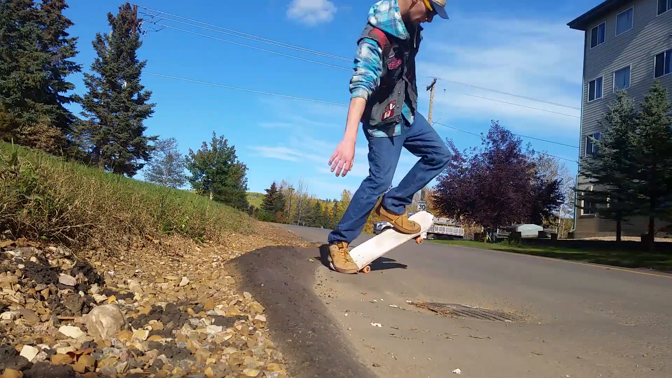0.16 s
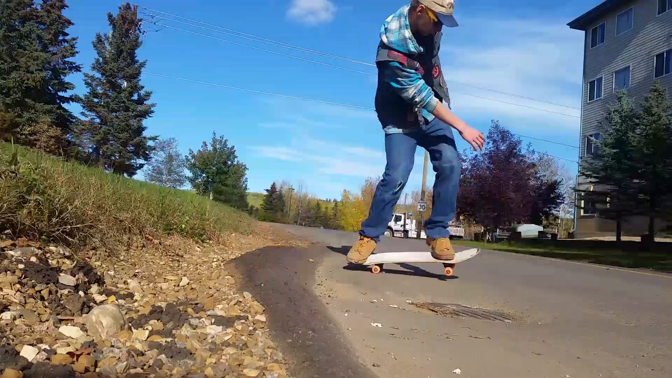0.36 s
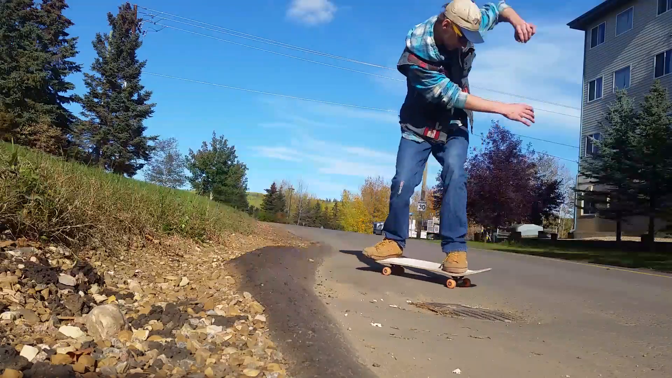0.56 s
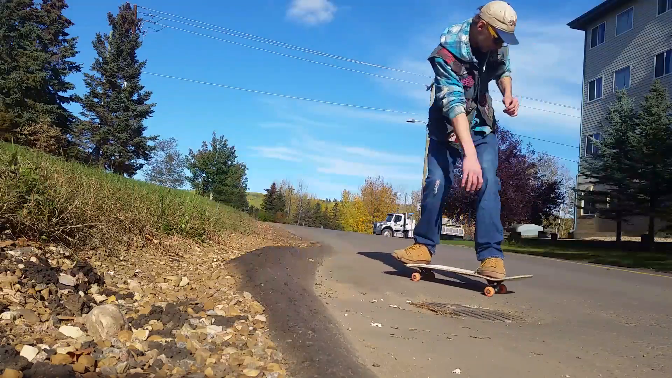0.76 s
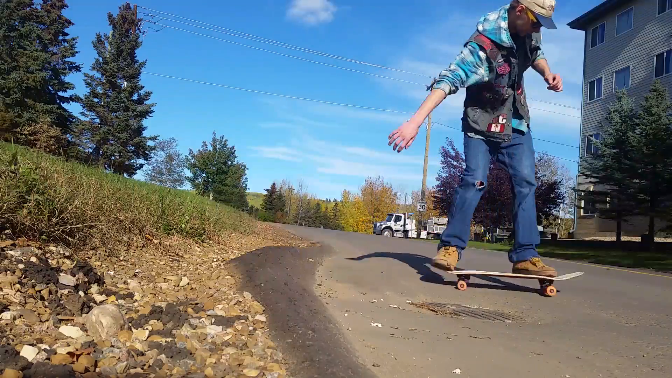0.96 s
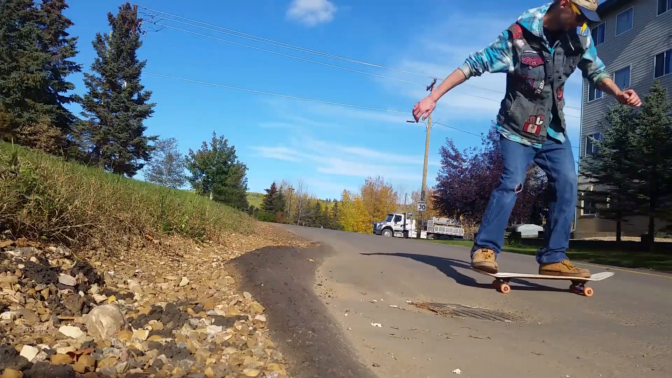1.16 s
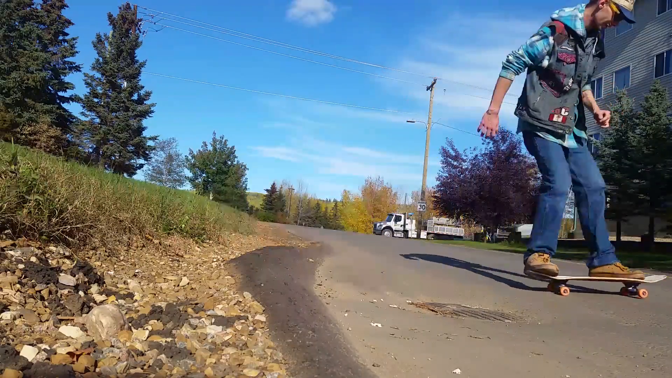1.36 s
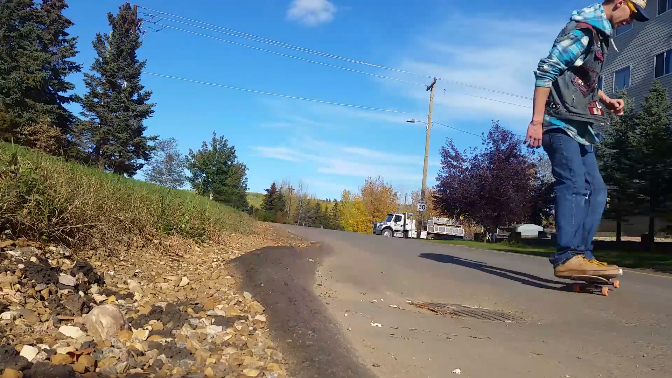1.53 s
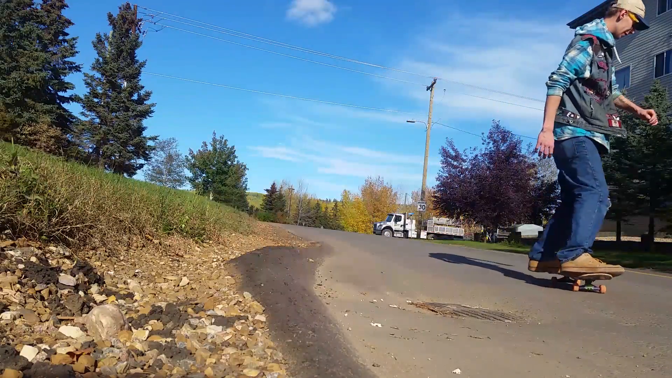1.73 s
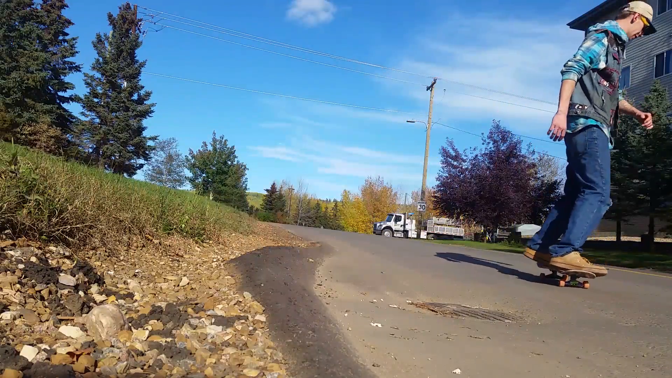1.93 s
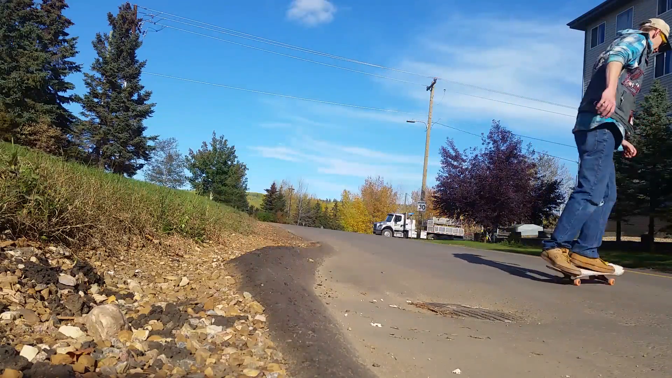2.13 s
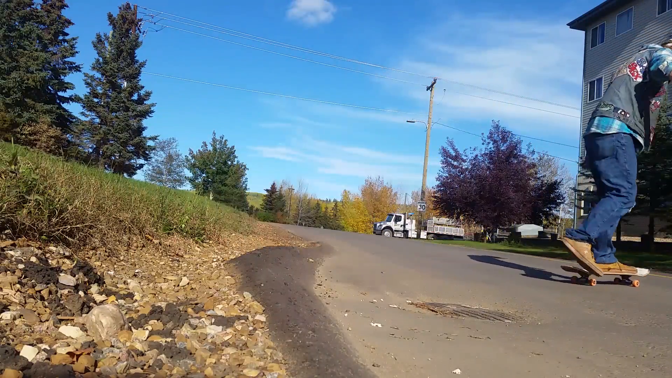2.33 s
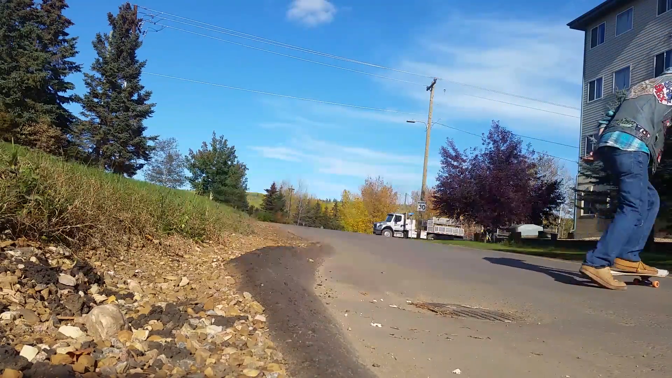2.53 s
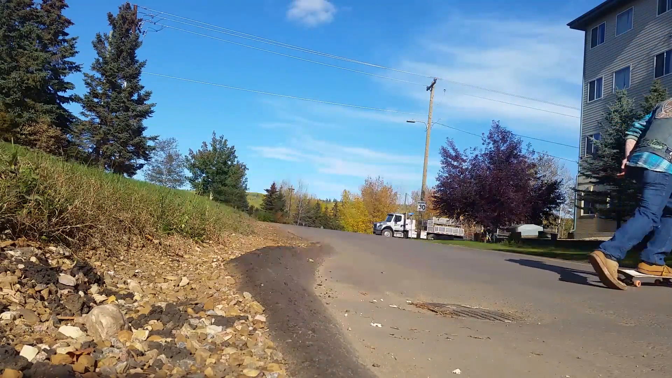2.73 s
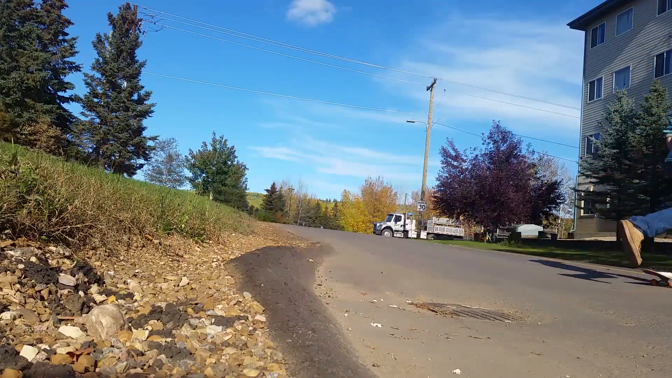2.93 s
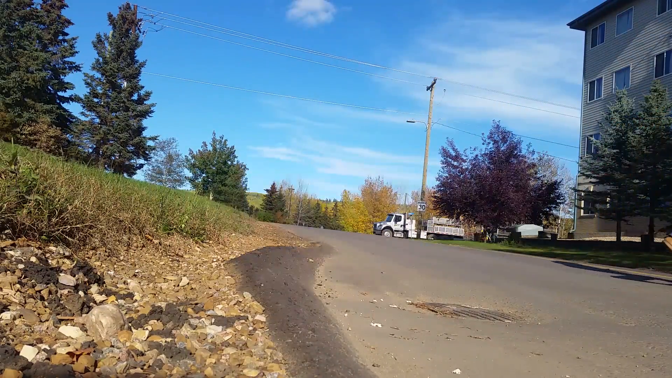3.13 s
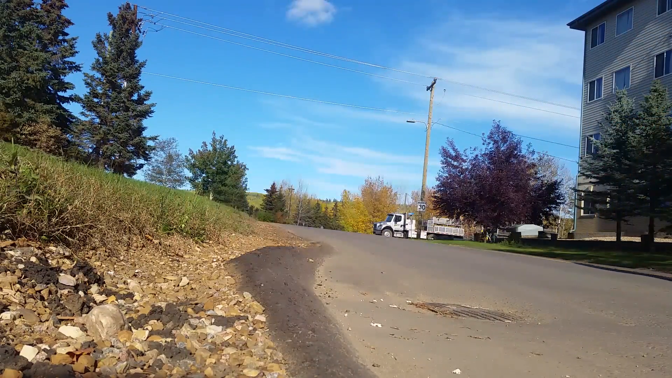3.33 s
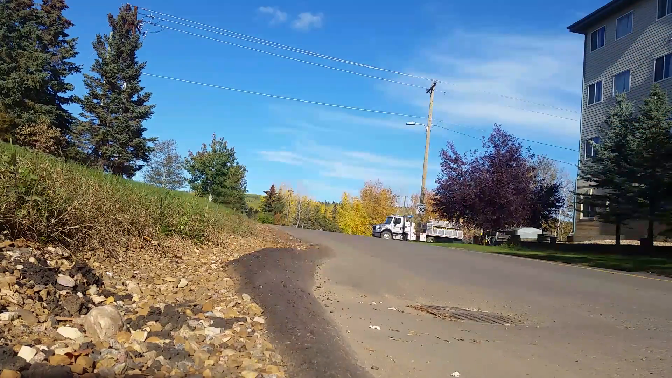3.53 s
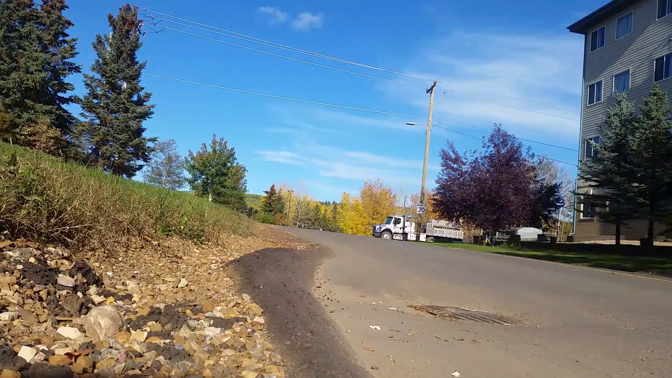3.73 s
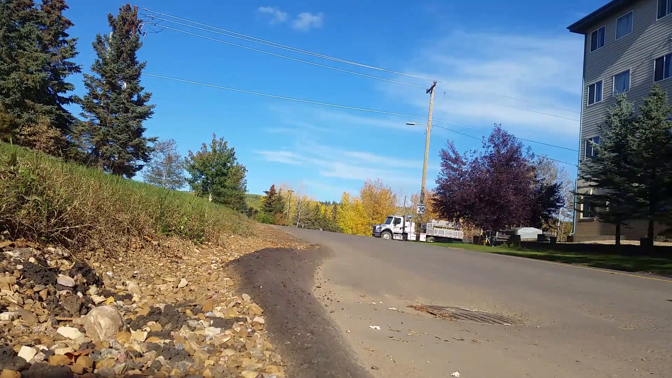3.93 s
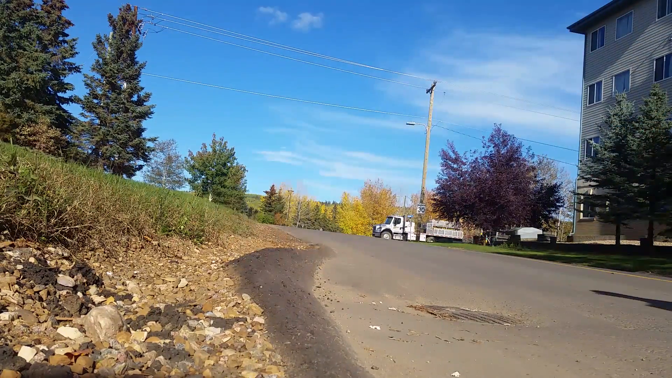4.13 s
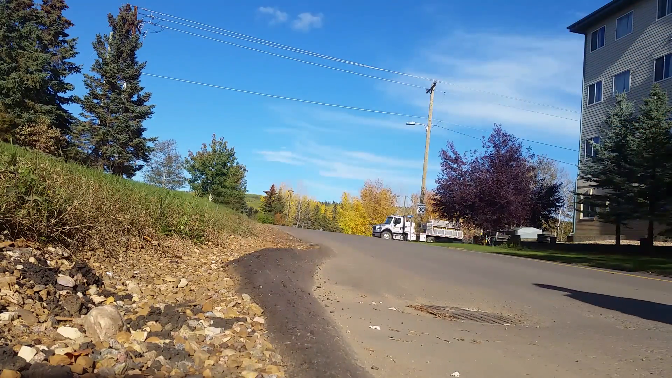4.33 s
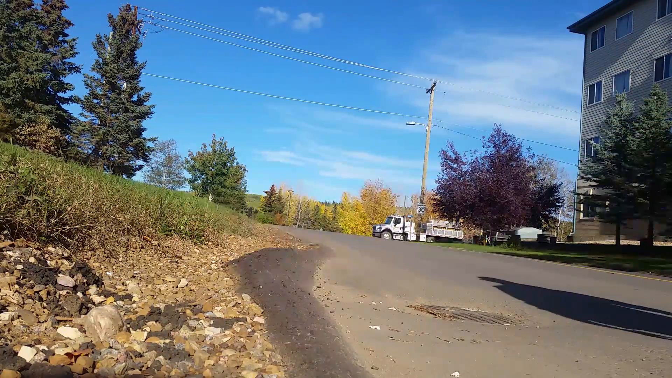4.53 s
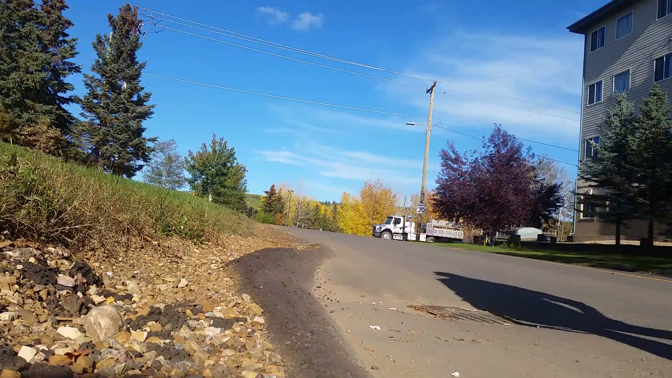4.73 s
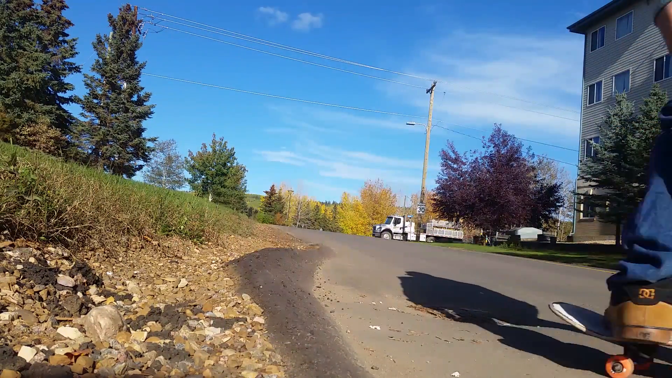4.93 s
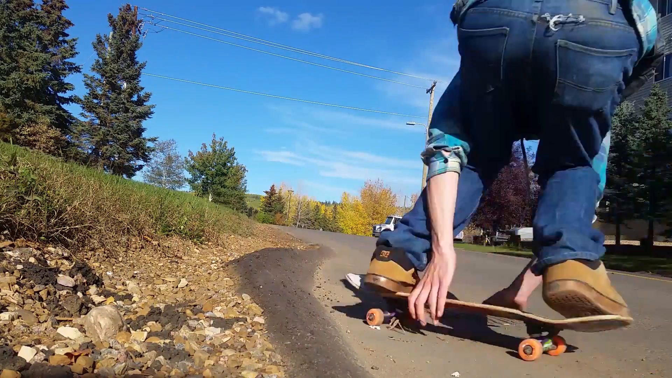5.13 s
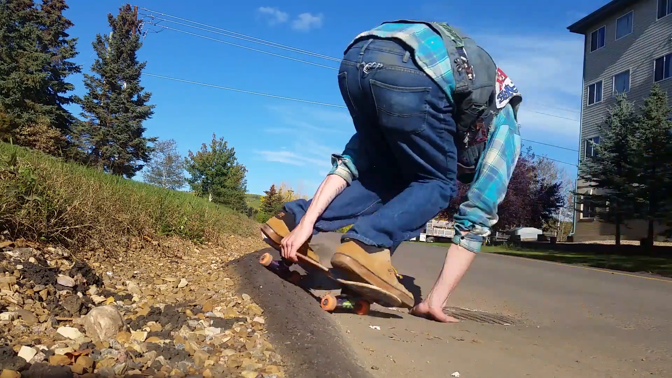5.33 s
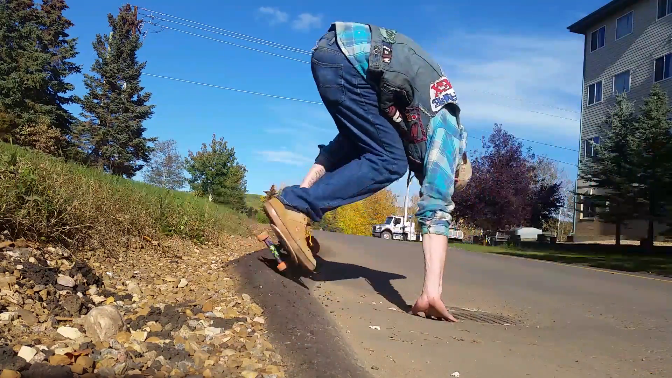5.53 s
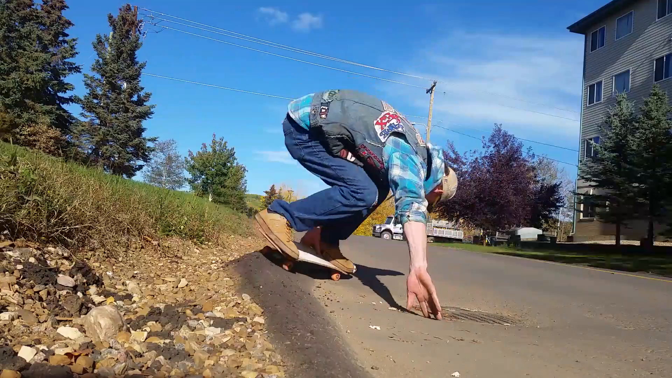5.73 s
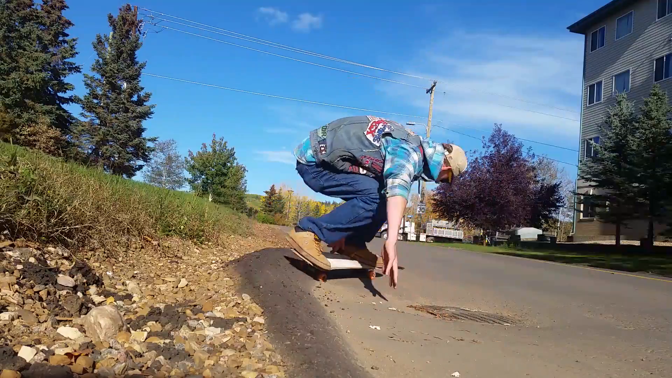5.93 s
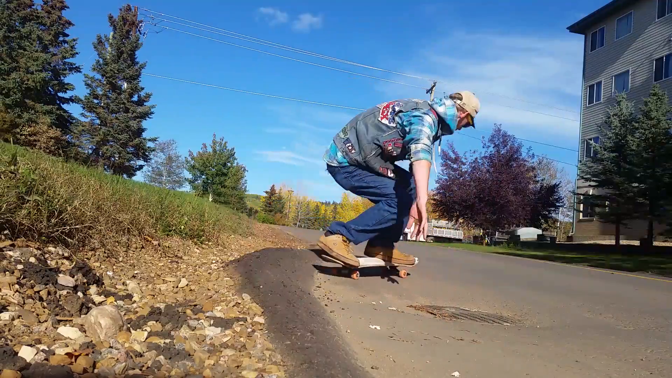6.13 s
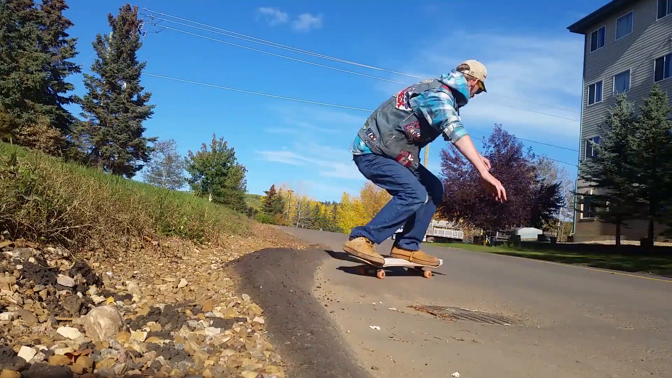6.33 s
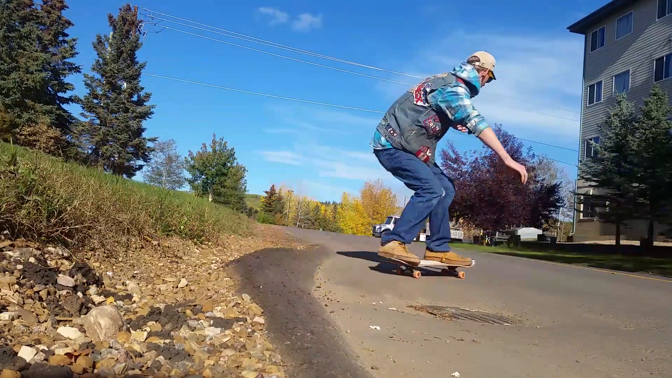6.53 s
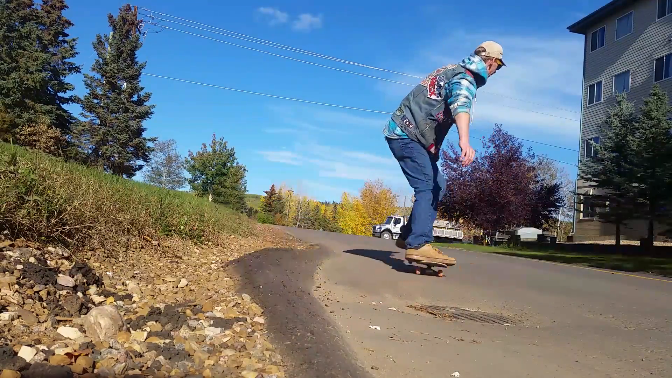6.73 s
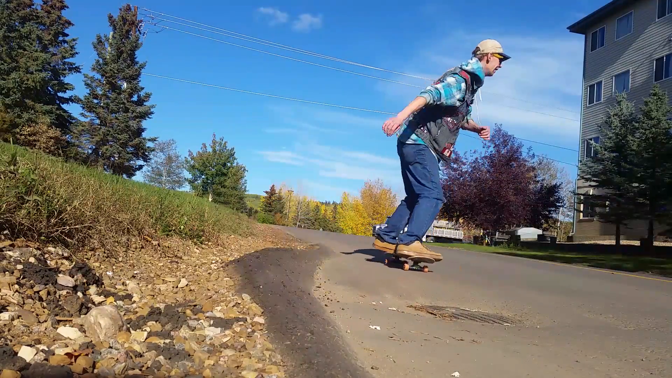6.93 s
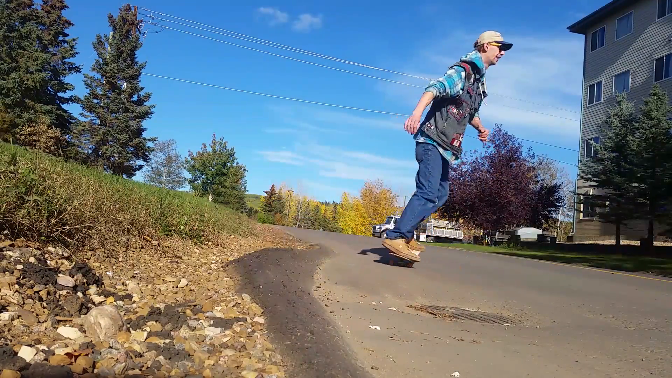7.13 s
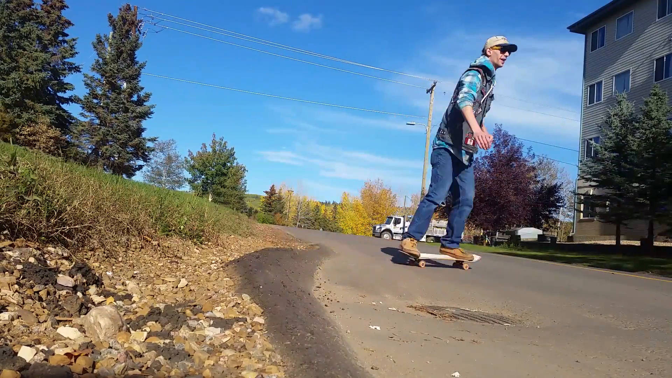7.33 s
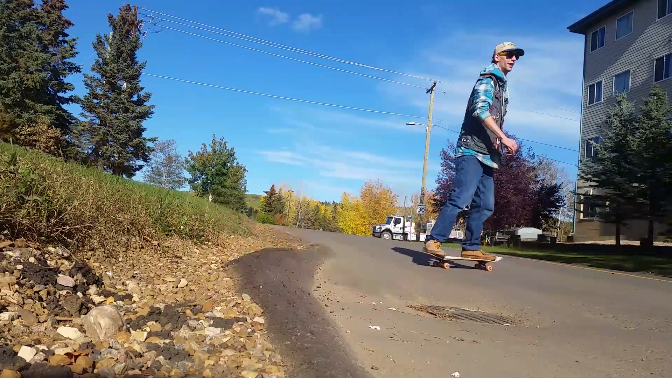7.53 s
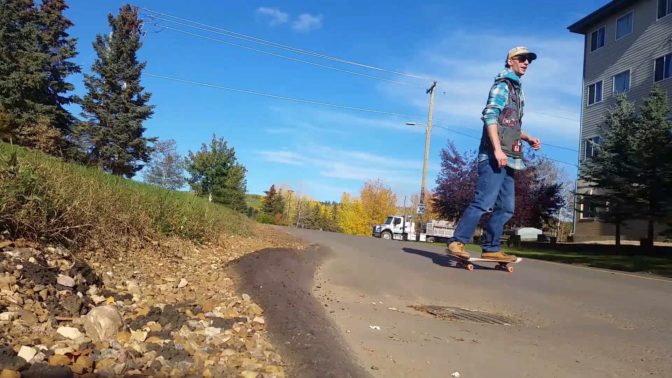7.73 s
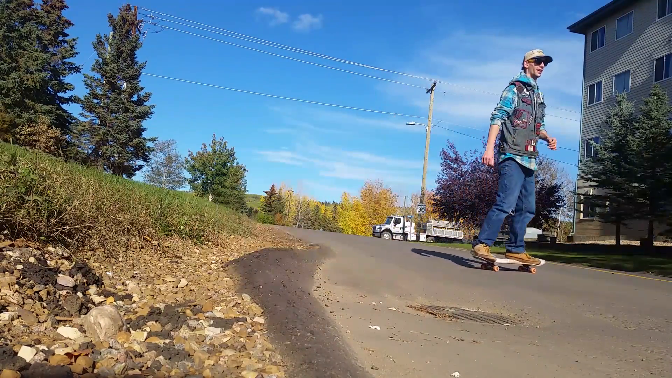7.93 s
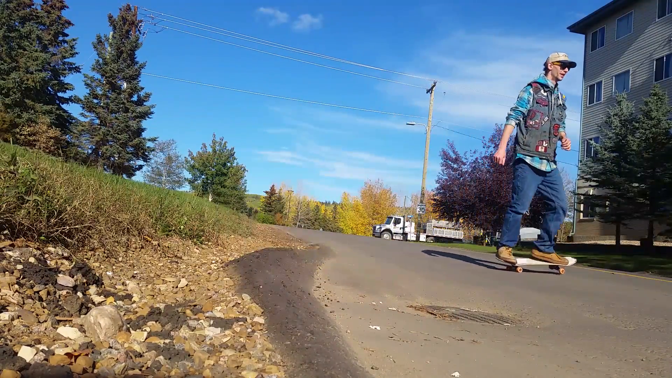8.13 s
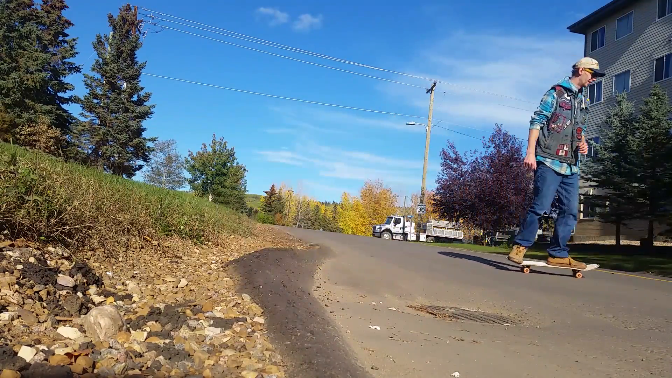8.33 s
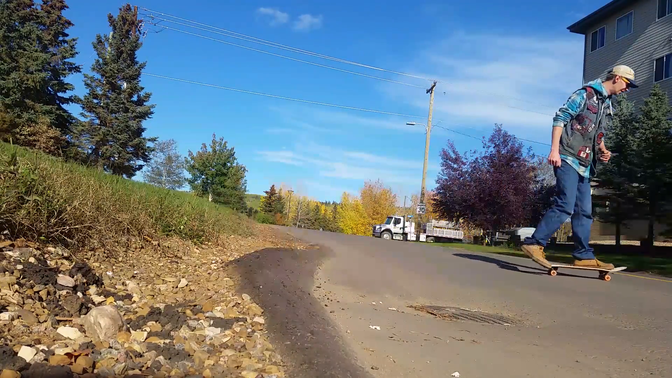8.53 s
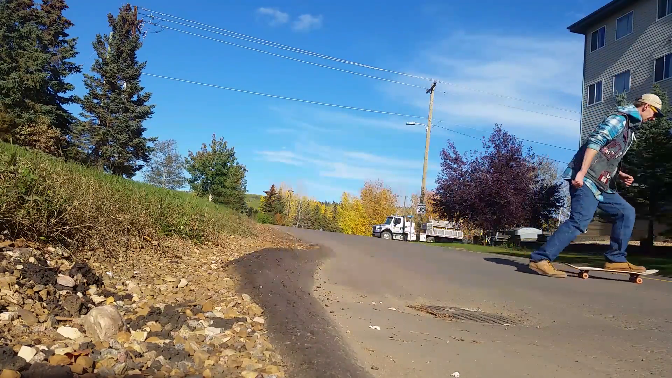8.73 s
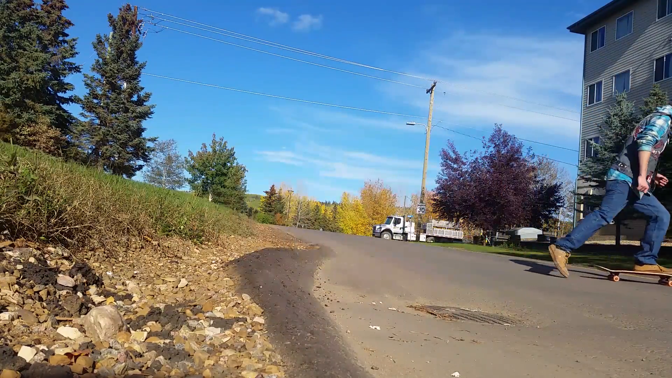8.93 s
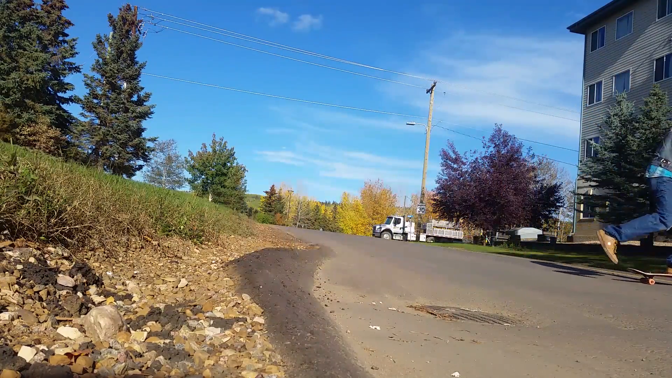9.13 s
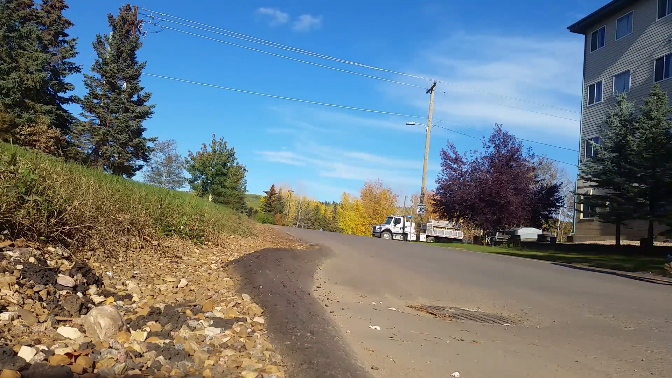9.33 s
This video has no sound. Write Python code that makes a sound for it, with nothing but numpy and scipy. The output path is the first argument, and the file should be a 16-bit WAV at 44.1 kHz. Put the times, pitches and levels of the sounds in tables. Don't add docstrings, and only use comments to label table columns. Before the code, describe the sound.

Gritty wheel rumble with small stone ticks comes first, broken by loose double clacks and one hard slap near two seconds. The sound thins toward the right and cuts out for an instant. Then a close pass swells into a droning roar, peaks with sharp curb knocks, and calms into lighter rolling with isolated cracks of wood and wheels. Outdoor street, low nearby microphones, lumpy low wind and slight wall echo.

```python
import sys
import numpy as np
from scipy import signal
from scipy.io import wavfile
from scipy.ndimage import map_coordinates

SR = 44100
rng = np.random.default_rng(int(sys.argv[2]) if len(sys.argv) > 2 else 0)


def int16_out(signal):
    q = np.round(np.clip(np.atleast_2d(signal).T, -1, 1) * 32767)
    wavfile.write(sys.argv[1], SR, q.astype(np.int16))


def linear_from_db(decibels):
    return 10 ** (np.asarray(decibels, float) / 20)


N = 413216


def board():
    # f/Hz, width/Hz, level/dB
    thrum_modes = [(107.2, 66.7, -2), (148, 64, 0), (232.3, 71.6, -4)]
    deck_modes = [(281.6, 82, 2), (369, 140.6, 0.5), (470, 64.6, 1.5), (560, 440, -12)]
    truck_modes = [(808, 580, -8.5), (1099, 140, 4.5), (1257, 127, 2.5), (1510, 211, 2.5), (1706, 318, 4),
                   (2066, 760, -3)]
    grit_modes = [(2310, 297, 5), (2850, 634, 2.5), (3540, 720, -0.5), (4250, 1850, -7), (5470, 730, -7),
                  (7000, 1700, -16)]
    # f/Hz, width/Hz, level/dB
    ply_modes = [(2110, 474, 3), (2564, 965, 2.5)]
    # f/Hz, width/Hz, level/dB
    drone_modes = [(482, 24, 0)]
    # low f/Hz, high f/Hz, left-right likeness/0-1, left lean/dB
    radiation = [
        (54, 283, 0.98, 0),
        (230, 930, .97, -1),
        (640, 2030, 0.91, 1.5),
        (1960, 6060, 0.5, -3.5),
        (11150, 14700, 0, 2.5),
        (1664, 3135, 0.88, 1),
        (308, 740, 1, 2),
    ]
    patchiness = (1.5, 1.5, 1.3, .9, 0, 0, 1.5)

    thrum_db, deck_db, trucks_db, grit_db, hiss_db = rolling()
    ply_db = 0.47 * trucks_db + 0.56 * grit_db
    drone_db = deck_db - 9 + 1.5 * (deck_db + 21)
    road = stones(per_s=2200, spread_db=2.5, smooth=0.7)
    blows = slaps(lead=8.4)
    bumps = 0.87 * drift(22) + 1.3 * drift(150)
    _, blow_db, weight, crack, _ = knocks().T
    # modes, rolling level in dB, strength of the knocks
    parts = [
        (thrum_modes, thrum_db + 0.5 * bumps, rattles(blow_db + 1.03 * weight - 4, stretch=0.51)),
        (deck_modes, deck_db + 1.32 * bumps, rattles(blow_db + 0.76 * weight - 0.4, stretch=0.73)),
        (truck_modes, trucks_db + 1.38 * bumps, rattles(blow_db + 0.5, stretch=0.77)),
        (grit_modes, grit_db + 1.2 * bumps, rattles(blow_db + crack - 1.5, stretch=0.78)),
        ([], hiss_db + 0.32 * bumps, rattles(blow_db + crack - 14.5, stretch=1.0)),
        (ply_modes, ply_db + 1.1 * bumps, rattles(blow_db + 0.73 * crack + 3, stretch=0.87)),
        (drone_modes, drone_db + 0.5 * bumps, 0)]
    pair = np.zeros((2, N))
    for (modes, roll_db, knock), part, patchy_db in zip(parts, radiation, patchiness):
        shaking = linear_from_db(roll_db) * road + knock * blows
        pair += radiate(shaking, modes, part, patchy_db)
    return pair


def rolling():
    # t/s, wheel load as heard/dB, bite of the axles above it/dB, clear view of the wheels/dB
    ride = [(0, -37, -4.5, 4), (.45, -38, -6.5, 3.5), (.9, -30, -17.5, 5.5), (1.65, -39, -9.5, 3),
            (2.1, -41, -5.5, -3), (3.0, -38, -6, -1.5), (3.49, -29.5, -22, 1.5), (3.53, -30.5, -17, -10.5),
            (4.1, -25.5, -12, -6), (4.8, -21, -22, 4.5), (5.1, -22, -13, 4), (5.66, -19, -4, 2),
            (5.95, -30, -11.5, 4.3), (6.8, -31, -15.5, 1.5), (7.3, -33.5, -5, -4), (7.65, -40.5, -9.5, 7),
            (8.0, -43, -16.5, -8.5), (9.37, -41, -9.5, -8.5)]
    # middle t/s, half length/s, load/dB, bite/dB
    leans = [(.07, 0.041, 7.5, -2.5), (.3, 0.028, -1, 10), (.38, 0.053, -3.5, 7.5), (.22, 0.064, 6, 0.5),
             (.96, 0.12, -1.5, -0.5), (1.04, 0.076, -7.5, 9), (1.6, 0.11, 5, -0.5), (2.2, 0.17, 4, 1.5),
             (2.65, 0.13, 0, -4), (2.86, 0.12, -1.3, -2.5), (3.17, 0.093, 0.5, 4), (3.55, 0.12, 4.5, 2.5),
             (3.99, 0.11, 0.7, 3), (4.25, 0.072, -10, 14.5), (4.44, 0.068, 1, 6.5), (5.27, 0.25, 4.5, -4),
             (5.45, 0.094, 0.5, -3.5), (6.15, .06, 2, -4), (6.58, 0.056, -3, 5), (6.81, 0.081, 1, 1),
             (7.18, 0.054, 4, -7), (7.29, 0.034, -3, 4.5), (8.27, 0.28, 0.6, 6), (8.93, 0.17, -0.5, 15.5),
             (9.27, 0.052, 4.5, 3)]
    # t/s, loss/dB, time down/s, recovery/s
    dips = [(.46, 7.5, 0.33, 0.15), (1.09, 4, 0.057, 0.023), (1.25, 5, 0.053, 0.082),
            (1.72, 1, 0.36, 0.034), (2.34, 4.5, 0.11, 0.1), (5.674, 6.5, 0.037, 0.016),
            (5.755, 11.5, 0.11, 0.042), (6.282, 8.5, 0.14, 0.2), (6.901, 4.5, 0.099, 0.027),
            (7.05, 4.5, 0.027, 0.1), (7.58, 1, 0.043, 0.1), (8.495, 4, 0.052, 0.23)]
    dip_shares = (1.53, 1.32, 1.12, 1.1, 0.82)
    street = (-61, -61, -72, -67.5, -77.5)
    fall_s = 0.019

    load, bite, clear = joined([ride])
    lean_load, lean_bite = swells(leans)
    close = np.maximum(load + 26.5, 0)
    load, bite = load + lean_load, bite + lean_bite

    off = np.zeros(N)
    for s, loss, hold, regain in dips:
        corners = np.cumsum([s - fall_s, fall_s, abs(hold), abs(regain)])
        off += np.interp(np.arange(N) / SR, corners, [0, loss, loss, 0])

    deck = load - 4.5 + 0.19 * bite + 0.61 * close
    grit = load + bite - 11.5 + clear
    hiss = grit - 13 + 0.3 * clear - 0.21 * (bite + 10) + 1.1 * close
    levels = [load, deck, load + bite, grit, hiss]
    return [20 * np.log10(np.hypot(linear_from_db(db - share * off), linear_from_db(street_db)))
            for db, share, street_db in zip(levels, dip_shares, street)]


def knocks():
    # t/s, level/dB, low body weight/dB, crack/dB,
    # rattle length/s
    slap_rows = [(.63, -22.5, -1, -12, 0.021), (.644, -30, 9, -11, 0.017), (.652, -24, 3, -14, 0.014),
                 (.662, -26.5, 1.5, -20, 0.0081), (1.164, -30.5, 2, -7, 0.017), (1.19, -31, 5, -2, 0.026),
                 (1.214, -33, 1, -7, 0.014), (1.236, -35, 6.5, -2, 0.019), (1.848, -11.5, 2.5, -23, 0.0043),
                 (1.852, -12.5, -16, -15.5, 0.011), (1.864, -14, -6, -24, 0.004),
                 (2.372, -22.5, 5.5, -6.5, 0.012), (2.405, -23, 3.5, -6, 0.013),
                 (7.029, -21.5, 0, -23, 0.0074), (7.0325, -11, 1, -24, 0.0045),
                 (7.045, -30.5, 4, -16, 0.011), (7.5425, -21, -6, -8, 0.015),
                 (7.5505, -14.5, -3.5, -8, 0.0045), (7.554, -16, -15, -18.5, 0.0043),
                 (7.5705, -23, -1, -21, 0.0062), (8.449, -26.5, -5, -16, 0.012),
                 (8.474, -27.5, 4.5, -8.5, .015),
                 (5.126, -8.5, -11, -16, 0.0043), (5.154, -24.5, 4, -21, 0.015),
                 (5.315, -26.5, -4, -1, 0.0068), (5.722, -22, 1.5, -39, 0.015),
                 (5.739, -25.5, -6, -13, 0.0094), (5.899, -23.5, 12, -17, 0.013),
                 (5.913, -16.5, -4, -14, 0.0046), (5.931, -25, 13, -14, .019), (5.956, -24, -8, -10, 0.008),
                 (5.999, -25.5, 3.5, -15, 0.0079), (6.043, -25.5, -1, -15, 0.0092),
                 (6.235, -20.5, 4, -15, 0.0094), (6.246, -28, 10, -16, 0.021),
                 (6.576, -26.5, -8, -10, 0.007)]
    # t/s, level/dB, low body weight/dB
    tap_rows = [(0.062, -37, -1), (1.021, -32.5, -4), (2.033, -33.5, -13), (2.324, -30.5, -9),
                (2.633, -35.5, 3), (2.758, -32, -27), (2.845, -30, -5), (2.867, -31, 1.5), (3.573, -35, 3),
                (3.678, -39, -12), (5.084, -26, 3), (5.392, -39, -12), (5.342, -48, -1), (6.13, -32.5, -8),
                (6.157, -33, 12.5), (6.535, -36.5, -13), (6.701, -41, 11), (6.81, -37.5, -10),
                (6.967, -32.5, -8), (7.225, -35, -8), (7.27, -27, -11), (8.304, -41.5, -8),
                (8.91, -32, -28), (9.007, -33.5, -14), (9.027, -40, -7)]
    # t/s, level/dB
    tick_rows = [(5.683, -36), (6.038, -35), (6.71, -47), (6.81, -48), (6.862, -44), (7.38, -52),
                 (7.485, -44), (8.9, -50)]
    taps = [(*row, -21, 0.011) for row in tap_rows]
    ticks = [(*row, -20, 2, 0.004) for row in tick_rows]
    return np.vstack([slap_rows, taps, ticks])


def rattles(levels_db, stretch):
    out, t = np.zeros(N), np.arange(2600) / SR
    for (s, *_, length), level_db in zip(knocks(), levels_db):
        contact = 1 - np.exp(-t / 0.00022)
        fade = np.exp(-(t / (stretch * max(length, 0.002))) ** 1.045)
        i = round(s * SR)
        out[i:i + len(t)] = np.hypot(out[i:i + len(t)], linear_from_db(level_db) * contact * fade)
    return out


def slaps(lead):
    blows = stones(per_s=3100, spread_db=2.5, smooth=0.31)
    rows = knocks()
    clicks_at = [round(row[0] * SR) + 60 for row in rows]
    blows[0, clicks_at] = lead * rng.choice([-1, 1], len(rows))
    return blows


def stones(per_s, spread_db, smooth):
    sizes = linear_from_db(spread_db * np.minimum(rng.exponential(1, N), 3.5))
    sizes = sizes * (rng.random(N) < per_s / SR)
    clicks = rms_one(sizes) * rng.choice([-1, 1], (2, N))
    return rms_one(clicks + smooth * rng.standard_normal((2, N)))


def radiate(shaking, modes, part, patchy_db):
    low_hz, high_hz, alike, lean_db = part
    impulse = np.eye(1, 8192)[0]
    if modes:
        sound = band(body(shaking, modes, patchy_db), low_hz, high_hz)
        unit = band(body(impulse, modes), low_hz, high_hz)
    else:
        sound, unit = hiss_band(shaking, low_hz), hiss_band(impulse, low_hz)
    mid, side = sound / np.sqrt(np.sum(unit ** 2))
    alike = np.clip(alike, 0, 1)
    pair = np.sqrt((1 + alike) / 2) * mid + np.sqrt((1 - alike) / 2) * side * [[1], [-1]]
    return pair * linear_from_db([[lean_db / 2], [-lean_db / 2]])


def body(shaking, modes, patchy_db=0):
    out = 0
    for k, (hz, width, level_db) in enumerate(modes):
        r = np.exp(-np.pi * width / SR)
        poles = [1, -2 * r * np.cos(2 * np.pi * hz / SR), r * r]
        ringing = (1 - r * r) / 2 * signal.lfilter([1, 0, -1], poles, shaking)
        gain = linear_from_db(level_db + patchy_db * drift(8.3)) if patchy_db else linear_from_db(level_db)
        out = out + (-1) ** k * gain * ringing
    return out


def hiss_band(x, low_hz):
    x = signal.sosfilt(signal.butter(9, low_hz, "high", fs=SR, output="sos"), x)
    return signal.sosfilt(signal.ellip(8, 1, 18, 14720, fs=SR, output="sos"), x)


def placed(pair):
    # t/s, left ear late by/ms
    sideways = [(0, -0.037), (.6, 0.054), (1.15, 0.13), (1.6, 0.17), (2.8, 0.22), (3.49, 0.23),
                (3.52, 0.43), (4.6, 0.47), (4.95, 0.38), (5.35, 0.13), (5.6, -0.063), (5.9, -0.032),
                (6.6, 0.065), (7.4, 0.054), (7.8, 0.14), (8.5, 0.16), (9.37, 0.23)]
    late_ms, = joined([sideways])
    left = map_coordinates(pair[0], [np.arange(N) - late_ms * SR / 1000], order=3)
    lean_db = -0.8 - 2.8 * late_ms
    return np.array([left * linear_from_db(lean_db / 2), pair[1] * linear_from_db(-lean_db / 2)])


def wall(pair):
    delay_s, spread_s, low_hz, high_hz, level_db = 0.055, 0.06, 1900, 3100, -21
    t = np.arange(round(0.3 * SR)) / SR
    fade = (t > delay_s) * np.exp(-np.abs(t - delay_s) / spread_s)
    scatter = band(rng.standard_normal((2, len(t))) * fade, low_hz, high_hz, order=2)
    energy = np.sum(scatter ** 2) * (SR / 4) / (high_hz - low_hz)
    scatter = linear_from_db(level_db) * scatter / np.sqrt(energy)
    return signal.oaconvolve(pair.mean(axis=0)[None], scatter, axes=1)[:, :N]


def wind():
    # middle t/s, half length/s, level above the breeze/dB
    gust_rows = [(3.62, 0.58, 15.5), (4.2, 0.29, 17), (4.72, 0.45, 22), (5.75, 0.63, 19), (6.25, 0.53, 15),
                 (6.6, 0.23, 12), (7.1, 0.41, 18), (8.14, 0.28, 12)]
    breeze_db = -51
    wind_db = breeze_db + swells(gust_rows)[0]
    lumps_db = 2.4 * np.array([drift(7.7), drift(2.1)])
    rumble = rms_one(band(rng.standard_normal((2, N)), 31.6, 90.6))
    return linear_from_db(wind_db + lumps_db + [[-4], [3]]) * rumble


def joined(tables):
    s, *columns = np.transpose(np.vstack(tables))
    return [np.interp(np.arange(N) / SR, s, c) for c in columns]


def swells(rows):
    t, out = np.arange(N) / SR, np.zeros((len(rows[0]) - 2, N))
    for s, half, *sizes in rows:
        near = slice(max(round((s - half) * SR), 0), round((s + half) * SR))
        out[:, near] += np.outer(sizes, np.cos(np.pi / 2 * (t[near] - s) / half) ** 2)
    return out


def drift(rate):
    r = np.exp(-2 * np.pi * rate * 20 / SR)
    slow = signal.lfilter([1], [1, -2 * r, r * r], rng.standard_normal(N // 20 + 2002))[2000:]
    return np.interp(np.arange(N) / 20, np.arange(len(slow)), rms_one(slow))


def band(x, low_hz, high_hz, order=3):
    return signal.sosfilt(signal.butter(order, [low_hz, high_hz], "band", fs=SR, output="sos"), x)


def rms_one(x):
    return x / np.sqrt(np.mean(x ** 2) + 1e-20)


def scene():
    pair = board()
    return placed(pair) + wall(pair) + wind()


def low_pass(x):
    return signal.sosfilt(signal.butter(12, 15600, fs=SR, output="sos"), x)


def record(dry):
    shaded = body(dry[0], [(6800, 1200, 0)])
    heard = np.array([dry[0] - 0.2 * shaded, dry[1]])
    stop, back, full = 3.4915, 3.512, 3.535
    gate = np.interp(np.arange(N) / SR, [stop - 1 / SR, stop, back, full], [1, 0.002, 0.002, 1])
    peak = 1.1
    rounded = gate * peak * np.tanh(heard / peak)
    limited = signal.sosfilt(signal.cheby2(10, 60, 15600, fs=SR, output="sos"), rounded)
    return low_pass(limited)


dry = scene()
out = record(dry)
int16_out(out)
```